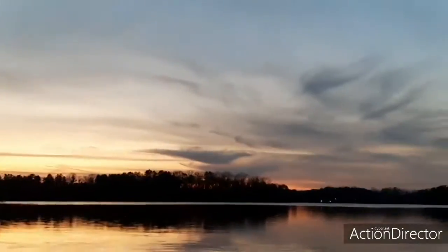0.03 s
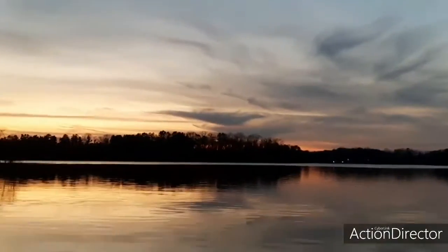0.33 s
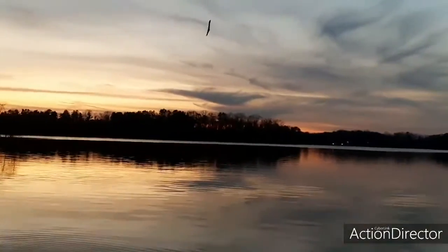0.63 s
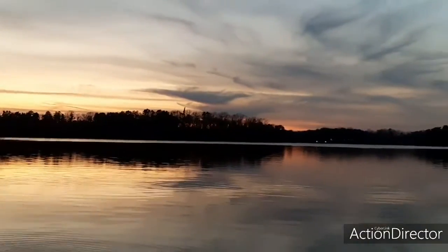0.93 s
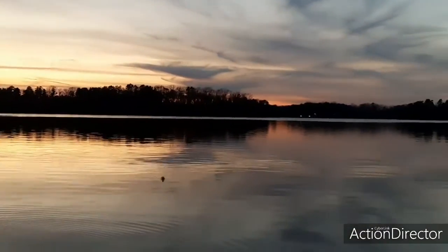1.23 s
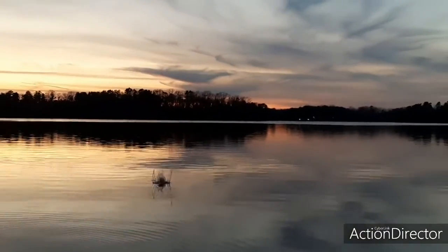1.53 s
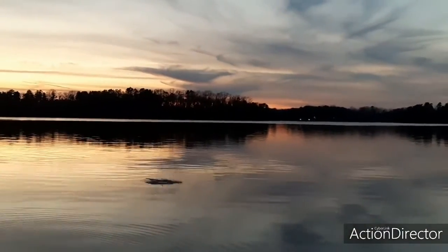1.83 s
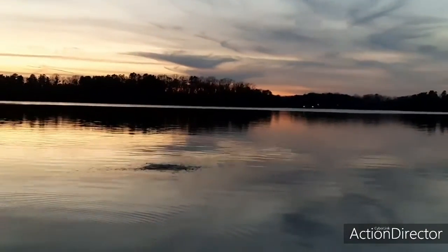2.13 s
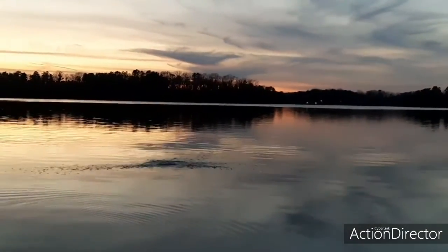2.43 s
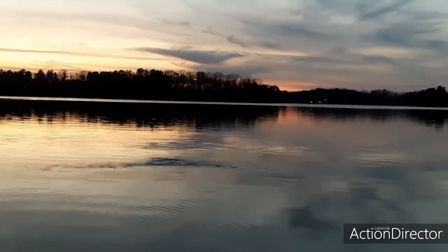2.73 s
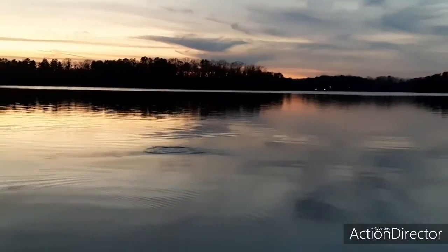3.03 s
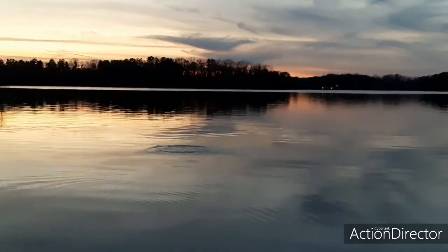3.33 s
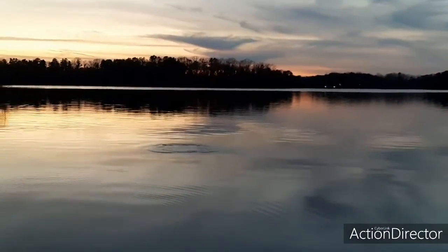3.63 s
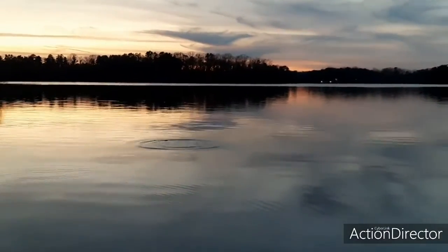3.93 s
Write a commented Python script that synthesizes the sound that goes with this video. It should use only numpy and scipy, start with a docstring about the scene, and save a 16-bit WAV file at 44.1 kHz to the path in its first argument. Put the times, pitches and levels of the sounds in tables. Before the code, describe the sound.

A small object splashes into a calm lake with a sharp slap and a bubbly gulp. Droplets patter back onto the surface and die away, leaving faint wind rumble and a distant engine hum outdoors.

```python
"""Small object thrown into a calm lake.

A sharp slap, the gulp of the air cavity closing, then thrown-up spray patters back for half a
second; trapped bubbles ring as damped, rising sines. Faint wind and far engines rumble across
the water. Clothing rustles, a few small ticks sound nearby, and the bank answers faintly."""
import sys
import numpy as np
from scipy import signal
from scipy.fft import rfft, irfft, next_fast_len
from scipy.io import wavfile
from scipy.ndimage import map_coordinates

SR = 44100
rng = np.random.default_rng(int(sys.argv[2]) if len(sys.argv) > 2 else 0)


def output_pcm(signal):
    """Save a mono or channel-first signal as 16-bit PCM at the path in sys.argv[1].

    Samples are clipped to [-1, 1] before scaling.
    """
    pcm = np.clip(np.atleast_2d(signal).T, -1, 1) * 32767
    wavfile.write(sys.argv[1], SR, np.round(pcm).astype(np.int16))


N = 176400


def amp(db):
    return 10 ** (np.asarray(db) / 20)


def unit_rms(x):
    return x / np.sqrt(np.mean(x ** 2) + 1e-20)


def clock():
    return np.arange(N) / SR


def at_hz(points, hz):
    """Interpolate (frequency, value) points on a log axis."""
    freqs, values = np.transpose(points)
    return np.interp(np.log(hz + 1), np.log(freqs + 1), values)


def curves(rows):
    """Per-sample curve of each column after the time."""
    times, *columns = np.transpose(rows)
    return [np.interp(clock(), times, column) for column in columns]


def gate(rows, fade_s):
    """1 over the rows' time span, exponential fade outside."""
    t = clock()
    outside_s = np.maximum(rows[0][0] - t, 0) + np.maximum(t - rows[-1][0], 0)
    return np.exp(-outside_s / fade_s)


def swells(rows):
    """Gain of overlapping swells, summed in power."""
    t = clock()
    gains = (amp(db - 20 * np.maximum(peak_s - t, 0) / rise_s - 60 * np.maximum(t - peak_s, 0) / t60_s)
             for peak_s, db, rise_s, t60_s in rows)
    return np.sqrt(sum(gain ** 2 for gain in gains))


def wobble(knots_per_s):
    """Smooth random curve."""
    knots = rng.standard_normal(int(N * knots_per_s / SR) + 4)
    return map_coordinates(knots, [clock() * knots_per_s])


def filtered(x, response):
    """Apply response(hz) by FFT."""
    size = next_fast_len(N + SR // 2)
    return irfft(rfft(x, size) * response(np.fft.rfftfreq(size, 1 / SR)), size)[..., :N]


def noise(spectrum, coherence):
    """Stereo noise, rms 1, of given spectrum and left-right coherence."""
    def response(hz):
        angle = np.arccos(np.clip(at_hz(coherence, hz), -1, 1)) / 2
        return amp(at_hz(spectrum, hz)) * [np.cos(angle), np.sin(angle)]
    mid, side = filtered(rng.standard_normal((2, N)), response)
    return unit_rms(np.array([mid + side, mid - side]))


# Ambient left-right likeness (frequency [Hz], coherence [-1..1])
AMBIENT_COHERENCE = [(60, 0.98), (180, 0.92), (550, 0.3), (1650, -0.12), (4970, 0.13), (15000, -0.12)]
# Wind spectrum (frequency [Hz], level [dB])
WIND_SPECTRUM = [(13, -52), (22, -31), (40, -10.5), (60, -1), (118, -0.5), (158, -4.5), (187, -6.5),
                 (228, -13), (270, -14.5), (343, -20), (543, -22), (877, -28), (1520, -36), (1800, -51.5),
                 (2340, -83), (3960, -120)]
# Wind swell (time [s], gain [dB])
WIND_SWELL = [(0, 0), (1.3, -0.36), (1.8, 1.5), (2.7, 1), (3.5, 1.5), (4, 0.5)]
def wind(level_db=-49, waver_db=0.42):
    """Low, gently swelling wind rumble."""
    swell_db, = curves(WIND_SWELL)
    return amp(level_db + swell_db + waver_db * wobble(6.82)) * noise(WIND_SPECTRUM, AMBIENT_COHERENCE)


# Hiss spectrum (frequency [Hz], level [dB])
AIR_SPECTRUM = [(1060, -26), (1800, -5.5), (2040, -0.5), (2490, -5.5), (3410, -6), (7020, -12.5),
                (7610, -6.5), (8630, -22), (11300, -5.5), (15500, -3.5)]
def air(level_db=-75.5):
    """Thin, steady hiss."""
    return amp(level_db) * noise(AIR_SPECTRUM, AMBIENT_COHERENCE)


def engine(track, waver_db, waver_hz):
    """A far engine's strongest order, wavering on its way over the water."""
    hz, db = curves(track)
    phase = 2 * np.pi * np.cumsum(hz + waver_hz * wobble(20)) / SR
    return np.sqrt(2) * np.sin(phase) * amp(db + waver_db * wobble(11)) * gate(track, fade_s=0.009)


# Engine drone (time [s], pitch [Hz], level [dB])
DRONE_TRACK = [(1.5, 126.8, -64.5), (1.75, 128.3, -50.5), (2.1, 133, -47.5), (2.55, 127.6, -47),
               (2.9, 124.9, -50.5), (3.25, 125.4, -51), (3.6, 117.1, -59.5), (4, 120.5, -57.5)]
# Whine, first gear (time [s], pitch [Hz], level [dB])
FIRST_GEAR = [(0, 243.5, -71), (.4, 266.7, -61), (.68, 285.8, -61), (.78, 278.6, -67)]
# Whine, second gear (time [s], pitch [Hz], level [dB])
SECOND_GEAR = [(.9, 262, -73), (1.021, 258.4, -59), (1.302, 276.6, -59.5), (1.602, 298.9, -61.5),
               (1.999, 288.2, -63), (2.5, 237.3, -62.5), (2.9, 221.5, -62.5)]
def far_engines():
    """A low drone and a whine through two gears."""
    whine = sum(engine(gear, waver_db=1.5, waver_hz=1.67) for gear in (FIRST_GEAR, SECOND_GEAR))
    return whine + engine(DRONE_TRACK, waver_db=1.2, waver_hz=1.13)


# Cloth swells (peak time [s], level [dB], 20 dB rise [s], t60 [s])
RUSTLE_SWELLS = [(0.04, -72.5, 0.15, 1), (0.535, -75, 0.15, 0.48), (0.803, -66.5, 0.023, 0.22),
                 (0.89, -76, 0.11, 1)]
# Cloth spectrum (frequency [Hz], level [dB])
RUSTLE_SPECTRUM = [(800, -4), (2000, 0), (7500, -2), (9200, -17), (11500, -3.5)]
def rustles():
    """Clothing brushes softly during the throw."""
    return swells(RUSTLE_SWELLS) * noise(RUSTLE_SPECTRUM, AMBIENT_COHERENCE)


# Splats and ticks (time [s], centre [Hz], width [oct], level [dB], t60 [s])
TICK_BURSTS = [(0.861, 5400, 0.3, -60, 0.0086), (0.9732, 850, 0.55, -50.5, 0.012),
               (1.9705, 11800, .45, -43, 0.004), (2.059, 2100, 0.35, -46.5, .02),
               (2.226, 5770, 0.26, -54.5, .02), (2.274, 13300, 0.27, -62.5, 0.027),
               (2.306, 6200, 0.22, -51, 0.013), (2.516, 8120, 0.62, -62.5, 0.006),
               (3.2251, 5440, 0.84, -61.5, 0.0089), (3.248, 5900, 1.3, -67.5, 0.025),
               (3.314, 8100, 0.25, -66.5, 0.019), (3.929, 7100, 0.15, -67.5, 0.01)]
def ticks():
    """Sharp drop splats and small nearby ticks, each a noise burst in one band."""
    out = np.zeros(N)
    for start_s, centre_hz, width_oct, db, t60_s in TICK_BURSTS:
        t = clock() - start_s
        band = lambda hz: np.exp(-.5 * (np.log2((hz + 1) / centre_hz) / width_oct) ** 2)
        burst = unit_rms(filtered(rng.standard_normal(N), band))
        out += burst * (t > 0) * amp(db - 60 * np.maximum(t, 0) / t60_s)
    return out


def bubble(t, hz, t60_cycles, rise=0.05):
    """Damped ring; pitch rises as the bubble nears the surface."""
    age = t * hz / t60_cycles
    phase = 2 * np.pi * hz * t * (1 + rise * np.minimum(age, 2) / 2)
    attack = 1 - np.exp(-t * hz * 4)
    return np.sin(phase) * amp(-60 * age) * attack


def patter(spectrum, per_s, spread_db, t60_cycles, tilt_db_per_oct_s=0, low_hz=507, high_hz=8530):
    """Even stream of droplet rings, rms 1. Tilt favours big drops early, fine ones late."""
    count = int(per_s * N / SR)
    when, pitch, size, place = rng.random((count, 4)).T
    start_s = when * N / SR
    hz = low_hz + pitch * (high_hz - low_hz)
    octaves = np.log2(hz / np.sqrt(low_hz * high_hz))
    mid_spray_s = np.mean([row[0] for row in SPRAY_ENVELOPE])
    tilt_db = tilt_db_per_oct_s * octaves * np.clip(start_s - mid_spray_s, -.3, .3)
    size_db = spread_db * np.minimum(-np.log(1 - size), 3)
    gain = amp(size_db + tilt_db) * np.sqrt(hz)
    offsets = np.arange(min(int(SR * t60_cycles / low_hz), 5000000 // count))
    rings = gain[:, None] * bubble(offsets / SR, hz[:, None], t60_cycles)
    indices = ((start_s * SR).astype(int)[:, None] + offsets).ravel()
    pan = (place[:, None] - .5) * 0.88
    stereo = np.array([np.bincount(indices, (rings * (1 + side * pan)).ravel(), N)[:N]
                       for side in (1, -1)])
    return unit_rms(filtered(stereo, lambda f: amp(at_hz(spectrum, f))))


def water_noise(spectrum):
    """Splash hiss, largely alike in both channels."""
    return noise(spectrum, coherence=[(1000, 0.71)])


ENTRY_S = 1.4004

# Falling spray (time [s], level [dB])
SPRAY_ENVELOPE = [(1.62, -61.5), (1.64, -64), (1.806, -54.5), (1.82, -50.5), (1.838, -54.5), (1.94, -50),
                  (2.314, -65), (2.344, -75), (2.42, -78.5)]
# Droplet spectrum (frequency [Hz], level [dB])
SPRAY_SPECTRUM = [(240, -18), (400, 1.5), (808, -4), (1470, -2.5), (1650, -9.5), (2550, -9), (3260, -13),
                  (6500, -13.5), (7670, -9), (8500, -27), (11000, -70)]
# Mist and foam spectrum (frequency [Hz], level [dB])
MIST_SPECTRUM = [(300, -24), (700, -1.5), (1500, 3.5), (3200, -5), (7500, -7.5), (9200, -29), (11500, -7),
                 (15500, -15)]
def spray():
    """Thrown-up water falls back as short splats and ringing plinks over a fine mist."""
    level_db, = curves(SPRAY_ENVELOPE)
    splats = patter(SPRAY_SPECTRUM, per_s=2000, spread_db=3.5, t60_cycles=14, tilt_db_per_oct_s=7.5)
    plinks = patter(SPRAY_SPECTRUM, per_s=380, spread_db=2.5, t60_cycles=52, tilt_db_per_oct_s=7.5)
    mist = water_noise(MIST_SPECTRUM)
    envelope = amp(level_db) * gate(SPRAY_ENVELOPE, fade_s=0.22) * (clock() > ENTRY_S)
    return envelope * (amp(-5.5) * splats + amp(-6) * plinks + amp(-7) * mist)


# Large bubbles (time [s], pitch [Hz], level [dB], t60 [cycles])
LARGE_BUBBLES = [(1.4105, 1450, -35.5, 42), (1.411, 690, -45, 17), (1.4298, 905, -22.5, 2.4),
                 (1.444, 687, -47, 56), (1.470, 670, -44, 22), (1.481, 620, -44, 28),
                 (1.502, 568, -49.5, 82), (1.518, 591, -41, 50), (1.516, 1284, -40, 35),
                 (1.524, 2480, -48, 100), (1.5303, 233, -29.5, 11.7), (1.5305, 590, -39, 28),
                 (1.5344, 1500, -47, 33), (1.539, 510, -43.5, 32), (1.5548, 560, -34, 4.1),
                 (1.555, 680, -42, 22), (1.555, 1120, -57, 45), (1.605, 745, -45, 37),
                 (1.606, 1070, -50, 40), (1.613, 970, -50, 69), (1.718, 732, -51, 37),
                 (1.734, 720, -47, 37), (3.2245, 1430, -44, 23)]
# Heaviest spray drops (time [s], pitch [Hz], level [dB])
HEAVY_DROPS = [(1.759, 2480, -50.5), (1.805, 1975, -54), (1.817, 1490, -46.5), (1.818, 1000, -48.5),
               (1.837, 2690, -51), (1.855, 1260, -56), (1.875, 1500, -51), (1.894, 1975, -47),
               (1.925, 3560, -48), (1.927, 4170, -44.5), (1.940, 2560, -48), (1.944, 1158, -48),
               (1.947, 824, -48.5), (1.96, 2560, -51), (2.008, 1420, -49), (2.038, 2910, -48),
               (2.058, 1940, -44.5), (2.070, 1235, -51.5), (2.084, 1488, -48), (2.159, 2680, -53),
               (2.191, 3650, -57), (2.244, 2450, -58), (2.263, 2460, -59), (2.284, 2440, -59)]
def bubbles(drop_t60_cycles=69):
    """Large bubbles ring out singly; each heavy drop traps a bubble too."""
    rows = LARGE_BUBBLES + [(*drop, drop_t60_cycles) for drop in HEAVY_DROPS]
    return sum(amp(db) * bubble(np.maximum(clock() - start_s, 0), hz, t60_cycles)
               for start_s, hz, db, t60_cycles in rows)


# Cavity collapse (peak time [s], level [dB], 20 dB rise [s], t60 [s])
CAVITY_SURGES = [(1.521, -52, 0.011, 0.087), (1.533, -45.5, 0.024, 0.11), (1.556, -54, 0.0056, 0.081)]
# Small-bubble spectrum (frequency [Hz], level [dB])
CHURN_SPECTRUM = [(240, -50), (400, -17), (500, 3), (1050, -3), (1800, 0), (2790, -33), (8000, -16),
                  (10400, -75)]
def gulp(foam_db=-6.5):
    """The air cavity closes in surges of small bubbles and foam."""
    churn = patter(CHURN_SPECTRUM, per_s=3000, spread_db=1.5, t60_cycles=18)
    foam = amp(foam_db) * water_noise(MIST_SPECTRUM)
    return swells(CAVITY_SURGES) * (churn + foam)


# Surface-cut spectrum (frequency [Hz], level [dB])
CUT_SPECTRUM = [(240, -49), (400, -30), (705, -14.5), (1130, -25), (1470, -12.5), (1910, -10.5),
                (2590, -13), (3850, -11), (4290, -8.5), (7670, -8), (10100, -27.5), (11800, -5),
                (15500, -16.5)]
# Water-sheet spectrum (frequency [Hz], level [dB])
SHEET_SPECTRUM = [(240, -42), (400, -16), (715, -2.5), (1710, -5), (7210, -32), (8670, -62), (11400, -28),
                  (15500, -42)]
def slap(level_db=-38.5, rise_db=14, rise_s=.012, cut_s=.0162,
         cut_t60_s=.0064, sheet_db=-8, sheet_t60_s=.23):
    """Hiss grows as the object cuts the surface, then gives way to a thin sheet of water."""
    t = clock() - ENTRY_S
    decay_s = np.maximum(t - cut_s, 0)
    attack_db = -rise_db * np.clip(1 - t / rise_s, 0, 1)
    cut = (t > 0) * amp(attack_db - 60 * decay_s / cut_t60_s)
    sheet = (t > cut_s) * amp(sheet_db - 60 * decay_s / sheet_t60_s)
    return amp(level_db) * (cut * water_noise(CUT_SPECTRUM) + sheet * water_noise(SHEET_SPECTRUM))


def shore(x, level_db=-17.5, t60_s=0.25):
    """Faint diffuse reflection from the bank."""
    t = np.arange(SR // 2) / SR
    tail = rng.standard_normal((2, len(t))) * amp(-60 * t / t60_s)
    tail /= np.linalg.norm(tail[0])
    return amp(level_db) * signal.fftconvolve(x, tail, axes=1)[:, :N]


def panned(x, balance):
    """Left-right level difference, band by band."""
    return filtered(x, lambda hz: amp(at_hz(balance, hz) * np.array([[.5], [-.5]])))


# Background balance (frequency [Hz], left minus right [dB])
FAR_BALANCE = [(60, -3), (300, -4), (1200, -7), (5000, -0.5), (14000, -6.5)]
# Foreground balance (frequency [Hz], left minus right [dB])
NEAR_BALANCE = [(60, -2), (110, -8), (200, -6.5), (380, -2), (700, -2.5), (1290, 0), (2380, -5),
                (4400, -7.5), (8120, -4.5), (15000, -6.5)]
def scene(left_lead_s=.00006):
    """Splash and small nearby sounds, answered by the bank, over the far rumble."""
    splash = slap() + gulp() + bubbles() + spray()
    splash = filtered(splash, lambda hz: np.exp(1j * np.pi * hz * left_lead_s * np.array([[1], [-1]])))
    near = splash + ticks() + rustles()
    near += shore(near)
    far = wind() + far_engines() + air()
    return panned(near, NEAR_BALANCE) + panned(far, FAR_BALANCE)


def record(dry, cutoff_hz=15800):
    """Brick-wall low-pass."""
    return filtered(dry, lambda hz: hz < cutoff_hz)


dry = scene()
out = record(dry)
output_pcm(out)
```